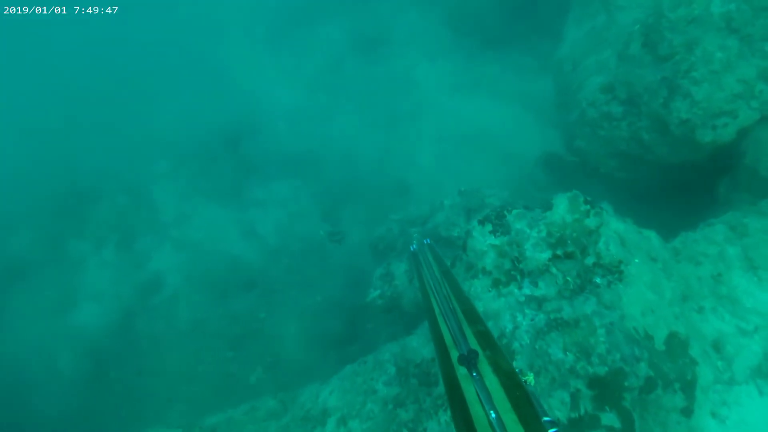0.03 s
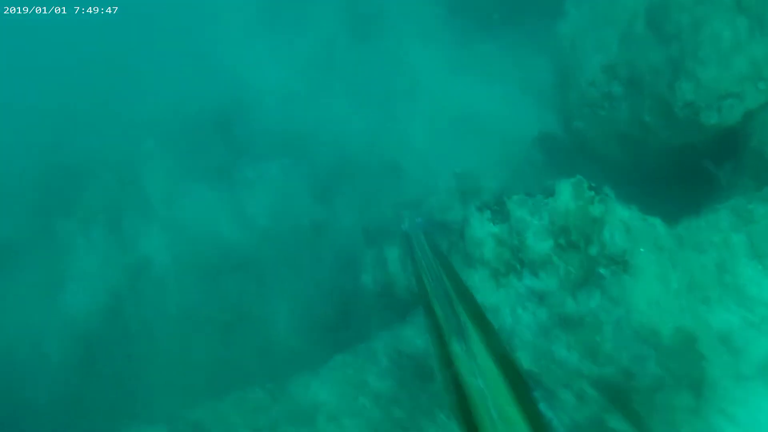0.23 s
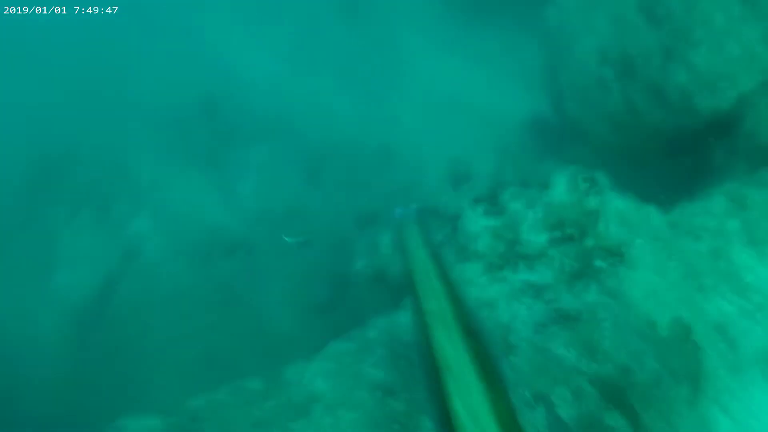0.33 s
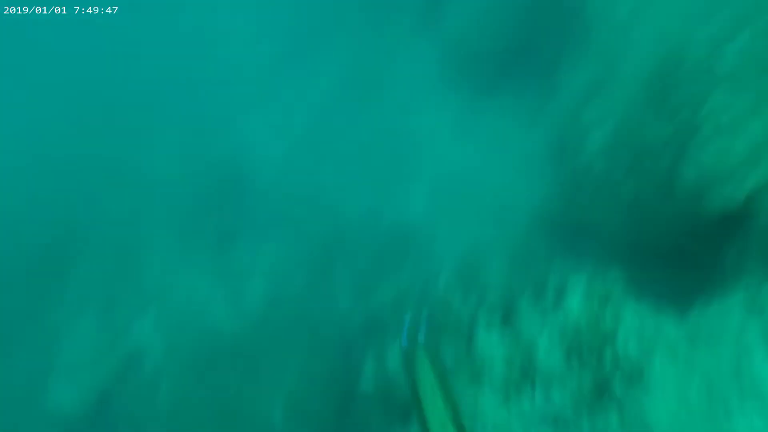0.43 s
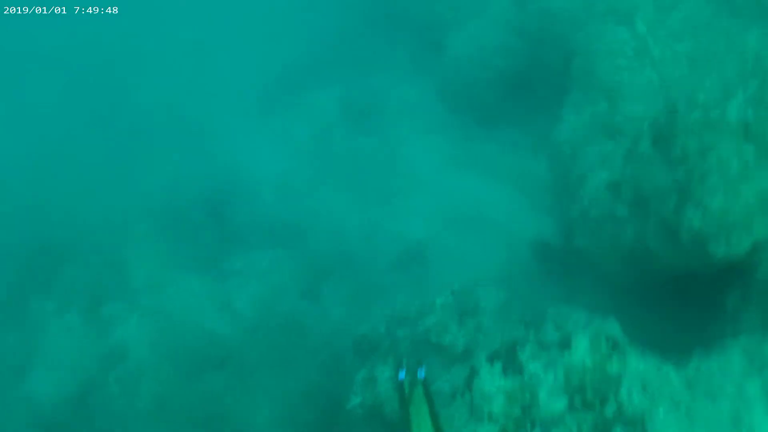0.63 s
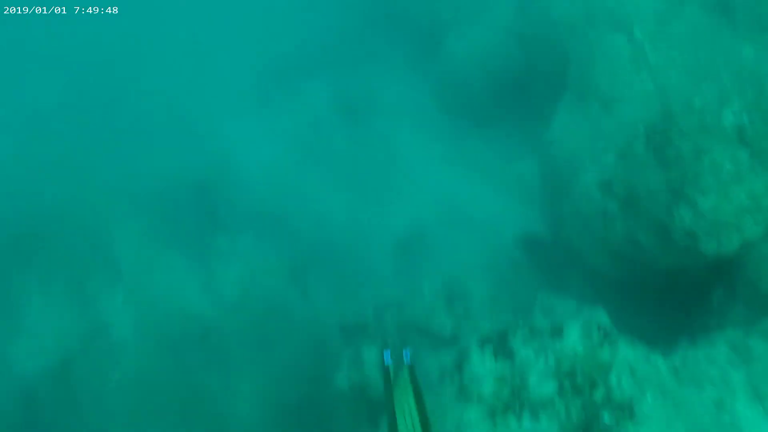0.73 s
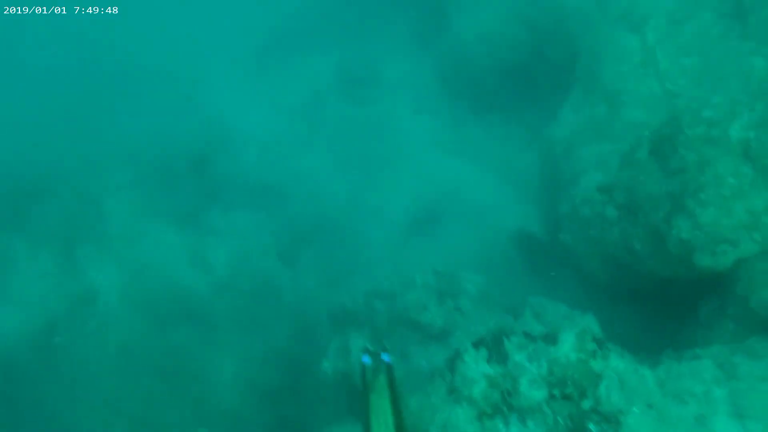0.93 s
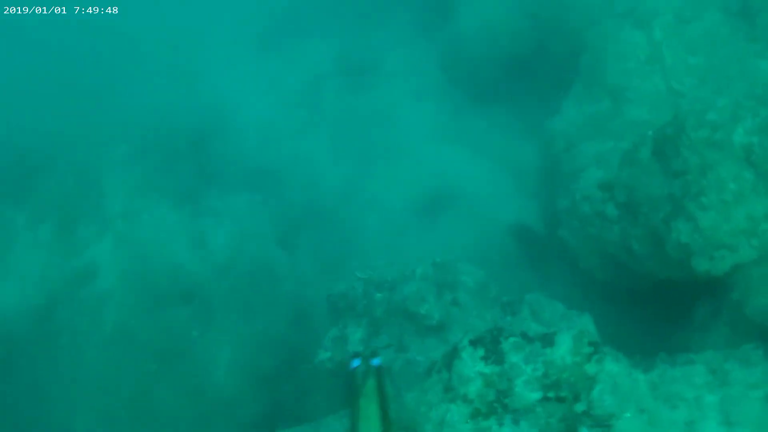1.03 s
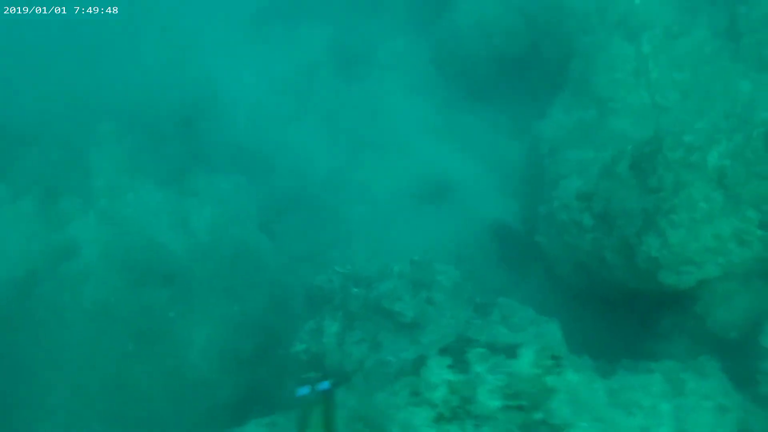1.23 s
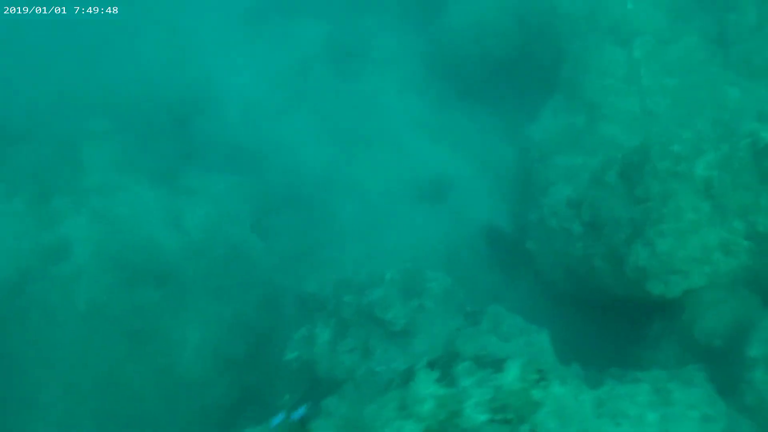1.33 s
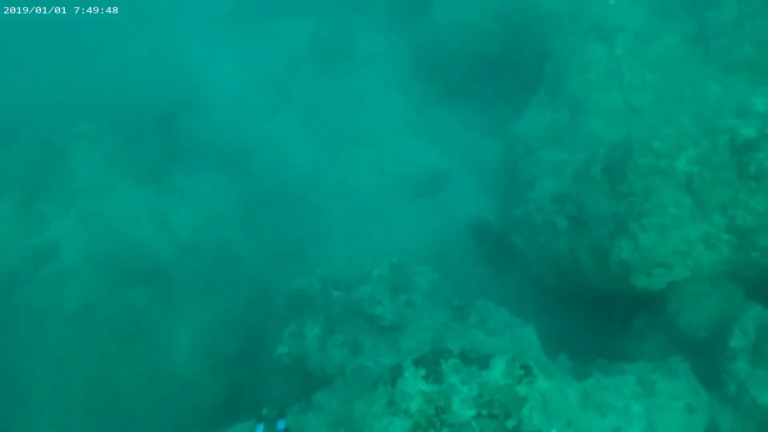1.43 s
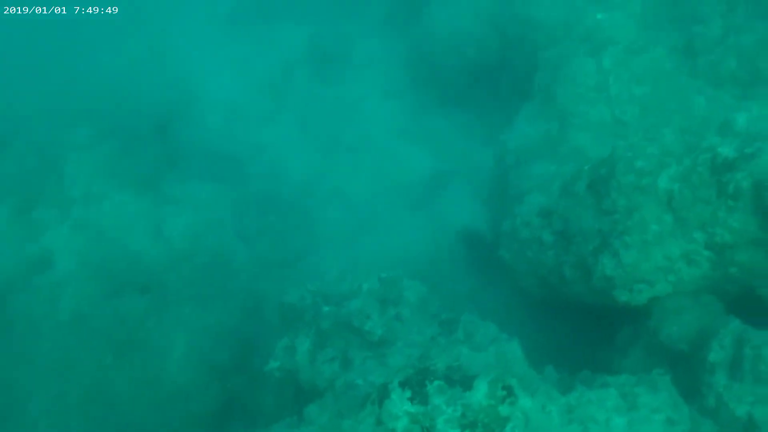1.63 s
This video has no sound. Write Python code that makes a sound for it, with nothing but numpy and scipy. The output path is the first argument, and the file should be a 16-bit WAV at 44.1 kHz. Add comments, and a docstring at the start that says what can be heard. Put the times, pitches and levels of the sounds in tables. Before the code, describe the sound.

A speargun fires underwater with a metallic snap and scrape ending in one loud crack. Fittings rattle briefly, then two dull knocks bump the camera housing amid faint reef clicks, low water rumble and a soft hum.

```python
"""A speargun fires over a reef, heard from a camera in a watertight housing.
The trigger snaps, the steel shaft scrapes down its rail, and the rubber bands slam home so hard that
they overload the microphone. Line and fittings rattle in the churned water.
Two dull knocks on the housing follow, among faint clicks, water rumble and a low hum."""
import sys
import numpy as np
from scipy import signal
from scipy.fft import rfft, irfft
from scipy.io import wavfile

SR = 44100
rng = np.random.default_rng(int(sys.argv[2]) if len(sys.argv) > 2 else 0)


def bounce(signal):
    """Save signal as a 16-bit WAV file at the path given by the first command-line argument."""
    frames = np.transpose(np.atleast_2d(signal))
    limited = np.clip(frames, -1, 1)
    pcm = np.round(limited * 32767).astype(np.int16)
    wavfile.write(sys.argv[1], SR, pcm)


N = 74970
TIME = np.arange(N) / SR
TRIGGER_S = .2321
CLANG_T60_S = .03  # a t60 is the time a sound takes to fade by 60 dB

# ring of the shaft and barrel: f/Hz, width/Hz, relative level/dB
CLANG_BANDS = [(1193, 140, -7), (1339, 170, -1), (1622, 250, 2.5), (1874, 250, -5), (2600, 900, -24.5)]
# bright ring of the steel fittings: f/Hz, width/Hz, relative level/dB
SNAP_BANDS = [(2860, 1200, -9), (4020, 700, 3.5), (5480, 1200, -4), (8020, 1100, -10),
              (10760, 16000, -16.5), (13900, 2500, -26)]


def rubber_slam():
    """The shaft leaves with a crack; the rubber bands hit, the housing booms and the barrel rings."""
    # blows of the rubber bands: t/s, level/dB
    slams = [(0.2931, 10), (0.298, 5), (0.3013, 5.5), (0.3059, 2.5)]
    # hollow tones of the barrel, started by the first blow: f/Hz, level/dB, t60/s
    barrel_tones = [(158.5, -14, .15), (537.6, -6.5, 0.15)]
    crack_force = from_db(-2.5) * burst(.2908, rise_s=.0009, t60=.007)
    crack = rubbed(crack_force, [(2280, 2200, 0)])  # one wide band around 2280 Hz
    blows = low_pass(sum(from_db(db) * impulse(s) for s, db in slams), hz=940)
    boom = signal.fftconvolve(blows, housing_ring())[:N]
    return crack + boom + struck_tones(slams[0][0], barrel_tones)


def shaft():
    """The shaft scrapes and screeches down the rail; the line runs out after it and the steel rings on."""
    # strength of the scraping: t/s, level/dB
    scraping = [(.235, -90), (.252, -21.5), (.268, -21.5), (.290, -10.5), (.308, -21), (.32, -33.5),
                (.39, -44), (.53, -74)]
    # falling tone as the shaft sticks and slips: t/s, f/Hz, level/dB
    stick_slip = [(0.244, 1793, -110), (.268, 1744, -10.5), (.281, 1500, -18.5), (0.2919, 1440, 1.5),
                  (.3, 1277, -110)]
    force, = gain_curves(scraping)
    hiss = from_db(-13.5) * low_pass(rubbed(force, SNAP_BANDS, grain_db=1), hz=9200)
    s, hz, db = np.transpose(stick_slip)
    wobble_hz = 128 * rms_one(low_pass(rng.standard_normal(N), hz=330))
    pitch = np.interp(TIME, s, hz) + wobble_hz
    screech = from_db(np.interp(TIME, s, db)) * np.sin(2 * np.pi * np.cumsum(pitch) / SR)
    scrape = rubbed(force, CLANG_BANDS, grain_db=1)
    ping = struck_tones(.4578, [(1653, -39, .14)])  # left by the last hit of the rattle
    return scrape + hiss + screech + ping


def trigger():
    """The trigger's catch grinds as it slips, then lets go with a bright metal ring."""
    # strength of the grinding: t/s, level/dB
    grinding = [(.222, -100), (.2255, -43), (.2315, -27.5), (.2327, -15.5), (.2365, -32), (.266, -110)]
    # tones of the freed catch: f/Hz, level/dB, t60/s
    catch_tones = [(1490, -19, 0.049), (4030, -13, 0.0074), (5660, -20.5, 0.03), (8100, -14.5, 0.0071)]
    force, = gain_curves(grinding)
    return rubbed(force, SNAP_BANDS) + rubbed(force, CLANG_BANDS) + struck_tones(TRIGGER_S, catch_tones)


def recoil():
    """The gun kicks back and shoves the water, pushing and pulling in turn."""
    # quickly fading swings of pressure: t/s, level/dB, f/Hz, t60/s
    shoves = [(.2272, 0, 130, 0.015), (.2312, -15.5, 54, 0.19), (.4065, -2, 82, 0.0093)]
    pressure = 0
    for k, (s, db, hz, t60) in enumerate(shoves):
        age = np.maximum(TIME - s, 0)
        pressure += (-1) ** k * from_db(db - 60 * age / t60) * np.sin(2 * np.pi * hz * age)
    return low_pass(pressure, hz=900)


def rattle():
    """Shaft, line and fittings knock together after the shot."""
    # hard hits: t/s, thud level/dB, clang level/dB, snap level/dB
    hits = [(.2905, -4, -18, -13), (.3025, -27, -12, -22.5), (.3135, -48, -42, -30), (.3342, -21, -41, -37),
            (.3375, -30, -35, -46), (.3432, -15, -35, -29.5), (.3492, -43, -52, -31.5),
            (.3642, -17, -60, -37), (.3787, -44, -59, -43), (.3863, -37, -62, -40),
            (.4022, -21.5, -33, -36.5), (.4095, -22.5, -53, -37), (.4472, -39, -58, -44.5),
            (.4582, -25, -40, -44.5)]
    return contacts(hits)


def knocks():
    """Soft bumps on the housing, each with one bounce and a short low thump."""
    # bumps: t/s, level/dB, treble cut-off/Hz, bounce delay/s, bounce relative level/dB
    bumps = [(0.7538, -15, 565, .0085, -3), (1.6025, -13.5, 714, 0.00582, -3)]
    blows = 0
    for s, db, hz, delay, bounce_db in bumps:
        bump = impulse(s) + from_db(bounce_db) * impulse(s + delay)
        blows += from_db(db) * low_pass(bump, hz, order=6)
    thump_hz = 151
    thump = from_db(-9.5) * np.exp(-TIME / .0037) * np.cos(2 * np.pi * thump_hz * TIME)
    return -signal.fftconvolve(blows, damped_ring(t60=.095) + thump)[:N]


def reef_clicks():
    """Loose contacts make faint, dull clicks over the reef."""
    # scattered hits: t/s, thud level/dB, clang level/dB, snap level/dB
    hits = [(.5217, -52, -53.5, -50), (.6914, -55.5, -57, -49.5), (.7343, -29.5, -52, -68.5),
            (.8689, -43, -49.5, -58.5), (.899, -56, -61, -54.5), (.938, -29, -56, -61.5),
            (1.2915, -55.5, -48.5, -60.5), (1.3863, -40, -45.5, -54), (1.405, -58.5, -47.5, -52.5),
            (1.4491, -54.5, -49.5, -53.5), (1.6342, -42, -41.5, -58), (1.691, -54.5, -46, -52.5)]
    return low_pass(contacts(hits, stretch=1.7), hz=4770)


def ticks():
    """Tiny random contacts crackle after the shot, growing louder as the gun is drawn back."""
    ticks_per_s, growth_db_per_s = 40, 11
    hits = (rng.random(N) < ticks_per_s / SR) * rng.random(N) * (TIME > TRIGGER_S)
    fade_per_sample = from_db(-60 / (CLANG_T60_S * SR))
    force = signal.lfilter([1], [1, -fade_per_sample], hits + 1e-18)
    return rubbed(force * from_db(-66.5 + growth_db_per_s * TIME), CLANG_BANDS)


def water():
    """Churned water rumbles and its random pushes ring the housing, over the steady wash of the reef."""
    # the gun's wake: t/s, rumble level/dB, housing ring level/dB
    wake = [(0, -49.5, -77), (.15, -52, -106), (.22, -39, -43), (.25, -19, -23.5), (.32, -17.5, -20),
            (.37, -34.5, -33.5), (.44, -31.5, -41.5), (.51, -37, -55.5), (.57, -47, -39), (.66, -42, -54),
            (1.0, -44, -59), (1.7, -45.5, -53.5)]
    # tone colour of the rumble: f/Hz, relative level/dB
    rumble_colour = [(20, 1.5), (35, -5), (55, 1), (85, 1), (115, -12), (200, -13), (400, -30.5),
                     (900, -65)]
    # tone colour of the wash: f/Hz, relative level/dB
    wash_colour = [(20, 1.5), (140, 0), (280, -7), (680, -5), (850, -15.5), (1650, -17), (2300, -22),
                   (5800, -26), (8000, -30.5), (15500, -33.5)]
    rumble_gain, push_gain = gain_curves(wake)
    rumble = rumble_gain * coloured_noise(rumble_colour)
    pushes = push_gain * rng.standard_normal(N)
    ring = housing_ring()
    ringing = signal.fftconvolve(pushes, ring / np.linalg.norm(ring))[:N]
    wash = from_db(-57.5) * coloured_noise(wash_colour)
    return rumble + low_pass(ringing, hz=950, order=4) + wash


def hum():
    """A wavering hum and a thin whine; the housing's drone swells and fades."""
    # hum and whine: f/Hz, width/Hz, level/dB
    tones = [(696, 6.7, -66), (4810, 160, -77.5)]
    # strength of the drone: t/s, level/dB
    swells = [(0, -77), (.83, -63.5), (.87, -46), (.93, -63.5), (1.35, -77.5), (1.41, -43), (1.52, -60),
              (1.7, -51.5)]
    steady = sum(from_db(db) * rms_one(resonate(rng.standard_normal(N), hz, width))
                 for hz, width, db in tones)
    drone_gain, = gain_curves(swells)
    return steady + drone_gain * rms_one(resonate(rng.standard_normal(N), hz=402, width_hz=42))


def contacts(hits, stretch=1):
    """Each hard hit makes a thud in the housing, a clang and a snap; stretch slows the last two."""
    rise_s = .00095 * stretch
    blows = clang_force = snap_force = 0
    for s, thud_db, clang_db, snap_db in hits:
        blows += from_db(thud_db) * impulse(s)
        clang_force += from_db(clang_db) * burst(s, rise_s, CLANG_T60_S * stretch)
        snap_tail = from_db(-24) * burst(s, rise_s, t60=.07)
        snap_force += from_db(snap_db) * (burst(s, rise_s, t60=.014 * stretch) + snap_tail)
    thud = signal.fftconvolve(low_pass(blows, hz=850, order=6), damped_ring(t60=.12))[:N]
    snap = rubbed(snap_force, SNAP_BANDS)
    snap = np.where(TIME < .395, snap, low_pass(snap, hz=8950))  # duller once the shaft is far away
    return thud + rubbed(clang_force, CLANG_BANDS) + snap


def rubbed(force, bands, grain_db=0):
    """Many tiny contacts make each band ring; loudness follows the force, and grain makes it rough."""
    flutter = rms_one(low_pass(rng.standard_normal(N), hz=700))
    grain = rms_one(from_db(grain_db * flutter))
    ringing = sum(from_db(db) * resonate(force * grain * rng.standard_normal(N), hz, width)
                  for hz, width, db in bands)
    band_power = sum(from_db(db) ** 2 * np.pi * width / (2 * SR) for _, width, db in bands)
    return ringing / np.sqrt(band_power)


def struck_tones(s, tones):
    """A part is struck at time s; each tone swells over its first cycle and fades at its own rate."""
    age = np.maximum(TIME - s, 0)
    return sum(from_db(db - 60 * age / t60) * np.minimum(age * hz, 1) * np.sin(2 * np.pi * hz * age)
               for hz, db, t60 in tones)


def housing_ring():
    """How the housing rings after one tap, scaled to a peak of 1."""
    # the housing's own low tones: f/Hz, relative level/dB, t60/s
    tones = [(88.7, -15.5, 0.42), (160.3, -11, 0.12), (239, -15.5, 0.098), (404, -4, .055),
             (396.7, 0, 0.037), (528.1, 1, 0.06), (616, -18, 0.12), (740, -31, 0.21)]
    ring = sum(from_db(db - 60 * TIME / t60) * np.sin(2 * np.pi * hz * TIME) for hz, db, t60 in tones)
    return ring / np.abs(ring).max()


def damped_ring(t60):
    """The housing's ring, cut short by the part touching it."""
    return housing_ring() * from_db(-60 * TIME / t60)


def coloured_noise(colour):
    """Steady noise of power 1, shaped by rows of f/Hz, level/dB."""
    hz, db = np.transpose(colour)
    bin_hz = np.maximum(np.arange(N // 2 + 1) * SR / N, 1)
    gain = from_db(np.interp(np.log(bin_hz), np.log(hz), db))
    return rms_one(irfft(rfft(rng.standard_normal(N)) * gain, N))


def resonate(x, hz, width_hz):
    """Keep the band around hz by passing twice through a ringing filter."""
    r = np.exp(-np.pi * width_hz / SR)
    gain = (1 - r * r) / 2
    section = [gain, 0, -gain, 1, -2 * r * np.cos(2 * np.pi * hz / SR), r * r]
    return signal.sosfilt([section, section], x + 1e-18)


def low_pass(x, hz, order=2):
    """Soften everything above hz; a higher order cuts more steeply."""
    return signal.sosfilt(signal.butter(order, hz, fs=SR, output="sos"), x + 1e-18)


def burst(s, rise_s, t60):
    """A quick swell up to time s, then a steady fade."""
    swell = (TIME - s) / rise_s
    fade = -np.log(1000) * (TIME - s) / t60
    return np.exp(np.minimum(swell, fade).clip(-50, 0))


def impulse(s):
    """One click at time s, shared between the two nearest samples."""
    return np.maximum(0, 1 - np.abs(TIME - s) * SR)


def gain_curves(rows):
    """Turn rows of t/s, level/dB, ... into one gain curve per level column."""
    s, *columns = np.transpose(rows)
    return [from_db(np.interp(TIME, s, db)) for db in columns]


def from_db(db):
    """Turn decibels into a gain."""
    return 10 ** (np.asarray(db) / 20)


def rms_one(x):
    """Scale to an average power of 1."""
    return x / np.sqrt(np.mean(x ** 2) + 1e-20)


def scene():
    """The shot, the knocks and the reef, mixed into one channel."""
    shot = trigger() + recoil() + shaft() + rubber_slam() + rattle()
    reef = reef_clicks() + ticks() + water() + hum()
    return (shot + knocks() + reef)[None]


def record(dry):
    """The microphone overloads, flattening the loudest peaks; the highest treble is cut."""
    ceiling, hardness, cutoff_hz = .76, 5, 15900
    clipped = dry / (1 + np.abs(dry / ceiling) ** hardness) ** (1 / hardness)
    return signal.sosfilt(signal.ellip(10, .1, 90, cutoff_hz, fs=SR, output="sos"), clipped)


dry = scene()
out = record(dry)
bounce(out)
```